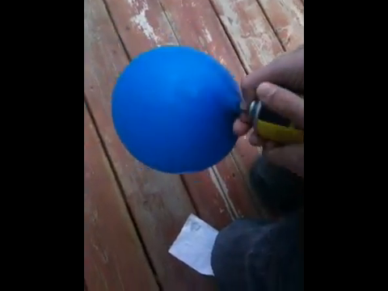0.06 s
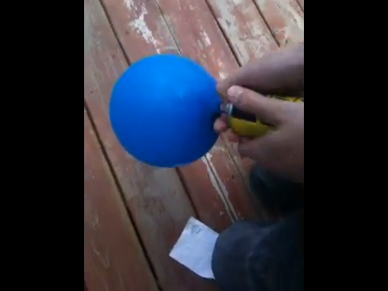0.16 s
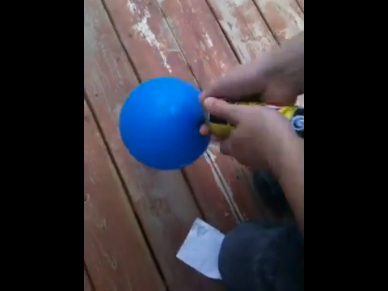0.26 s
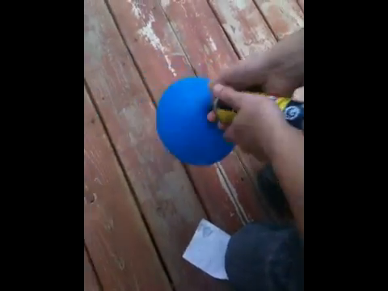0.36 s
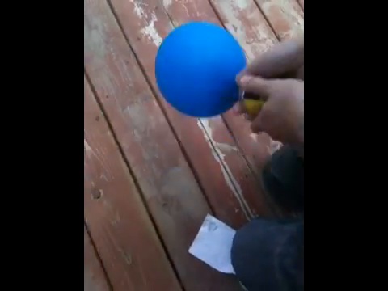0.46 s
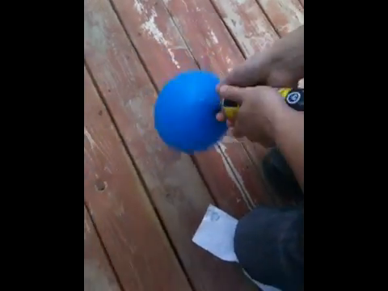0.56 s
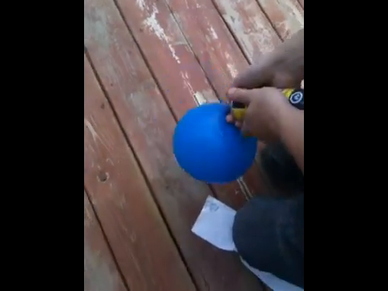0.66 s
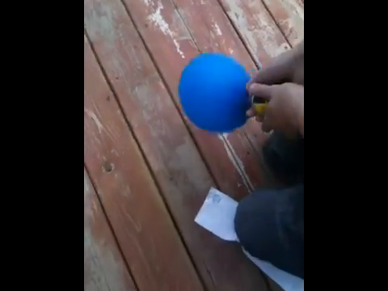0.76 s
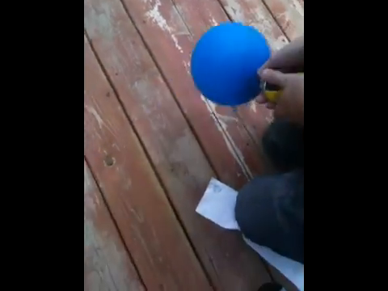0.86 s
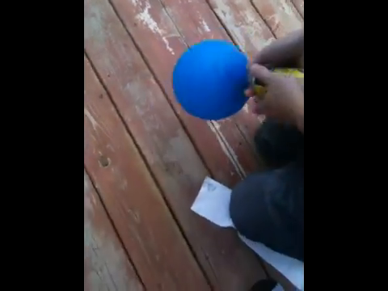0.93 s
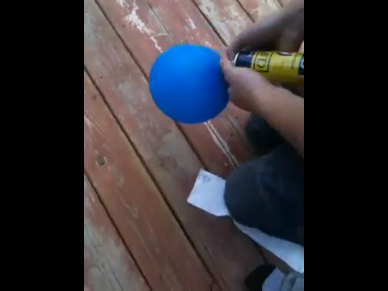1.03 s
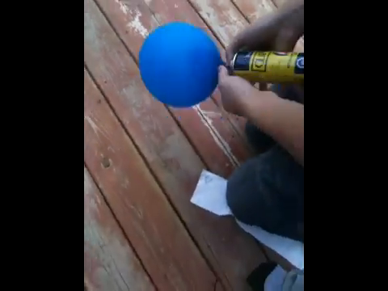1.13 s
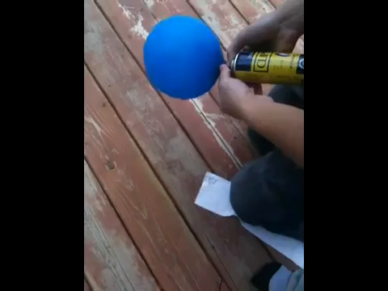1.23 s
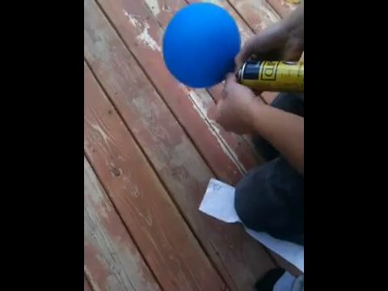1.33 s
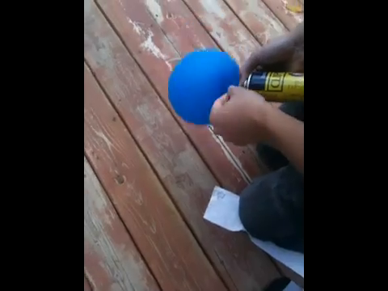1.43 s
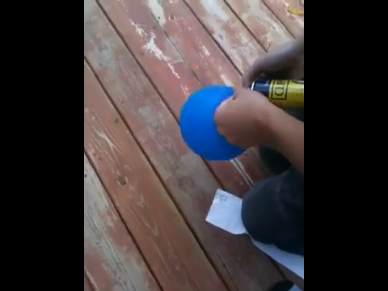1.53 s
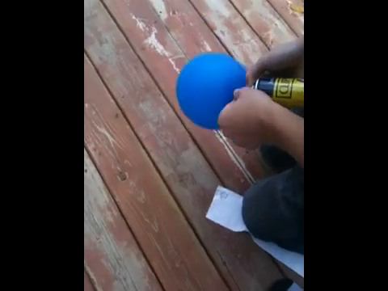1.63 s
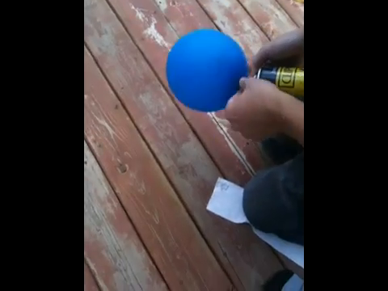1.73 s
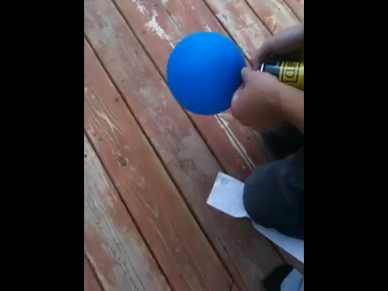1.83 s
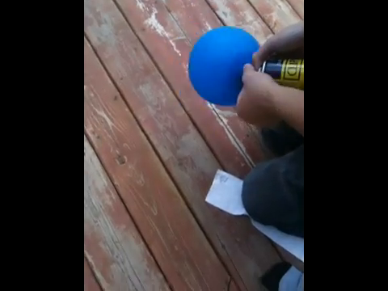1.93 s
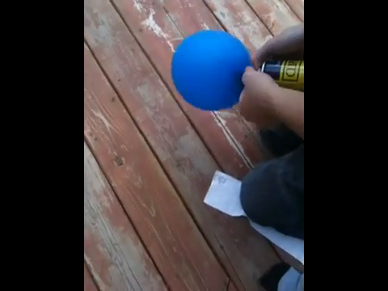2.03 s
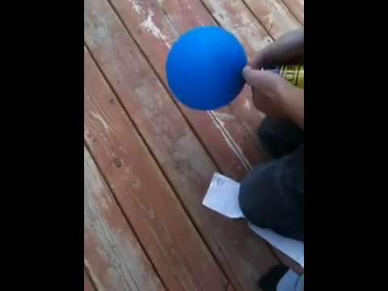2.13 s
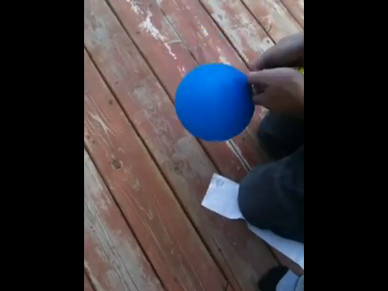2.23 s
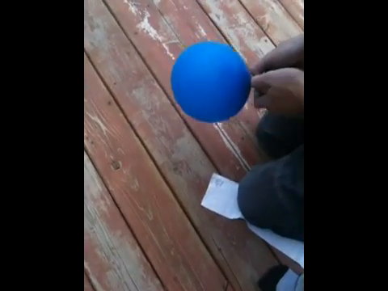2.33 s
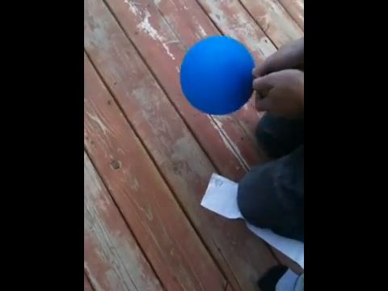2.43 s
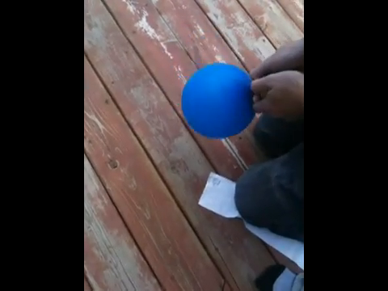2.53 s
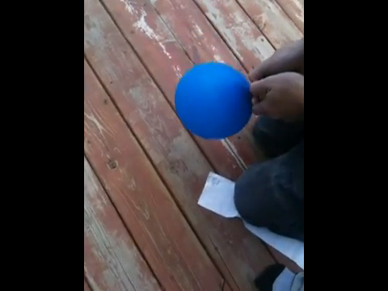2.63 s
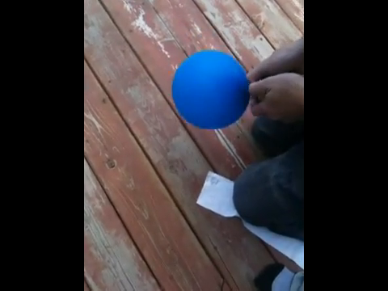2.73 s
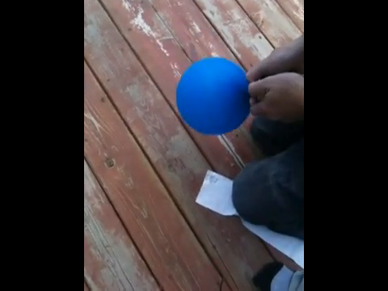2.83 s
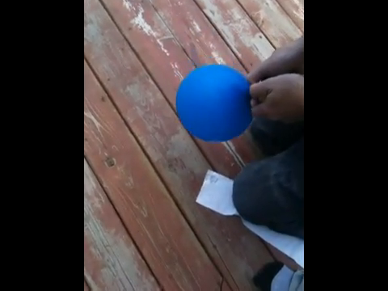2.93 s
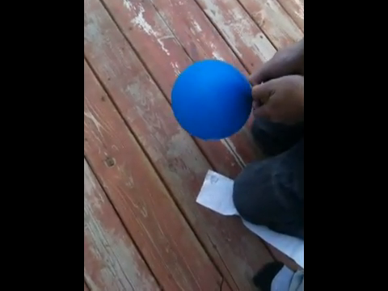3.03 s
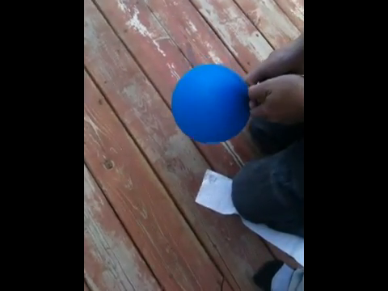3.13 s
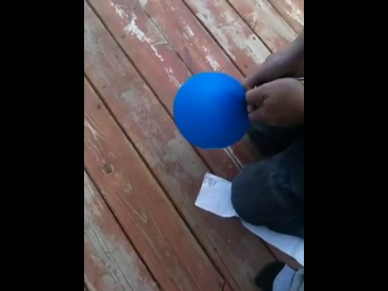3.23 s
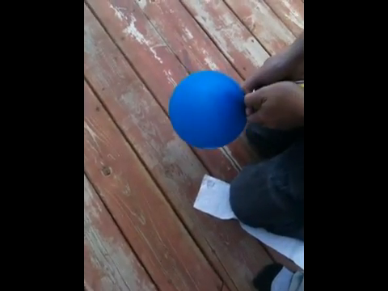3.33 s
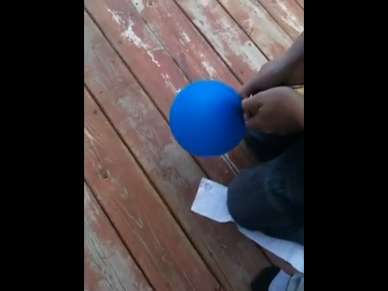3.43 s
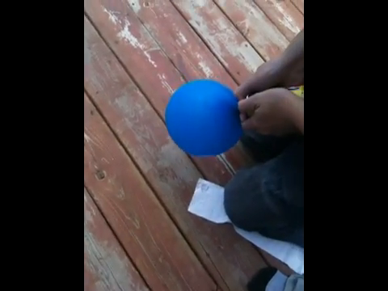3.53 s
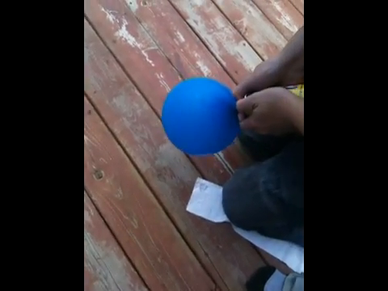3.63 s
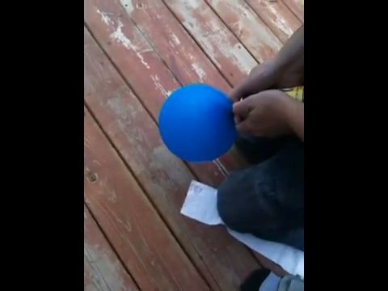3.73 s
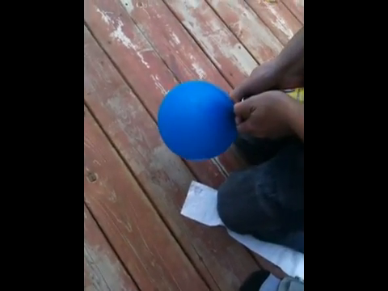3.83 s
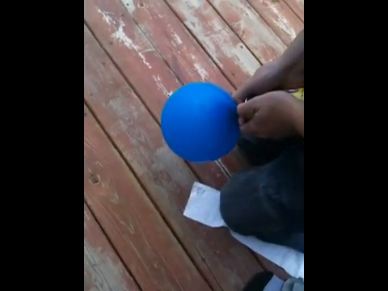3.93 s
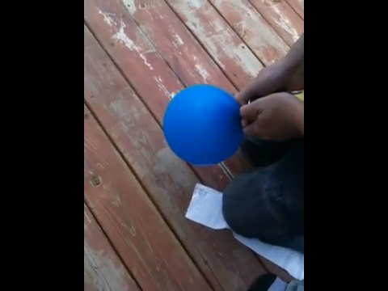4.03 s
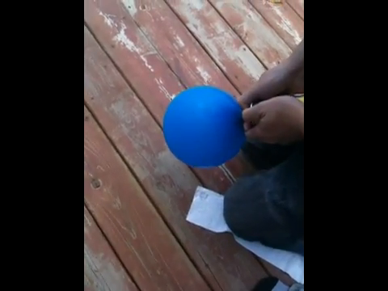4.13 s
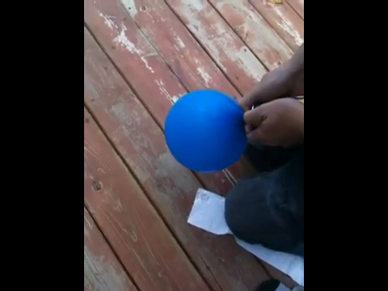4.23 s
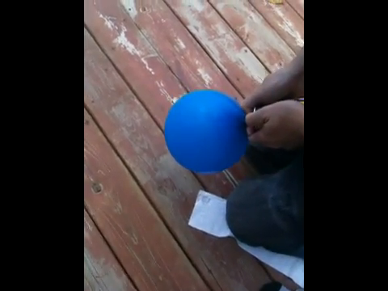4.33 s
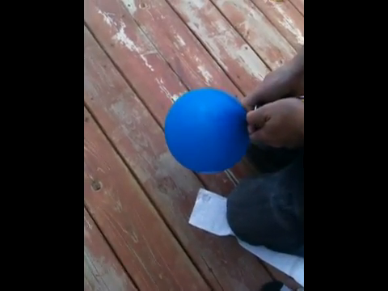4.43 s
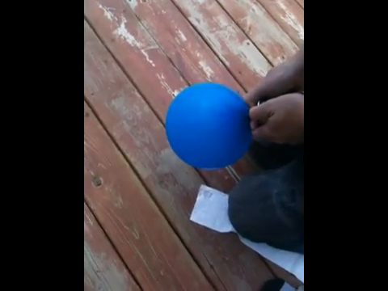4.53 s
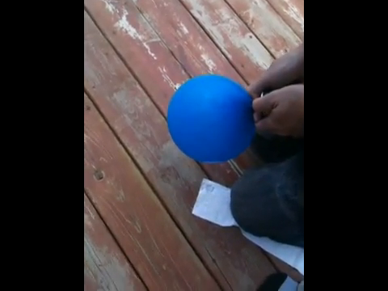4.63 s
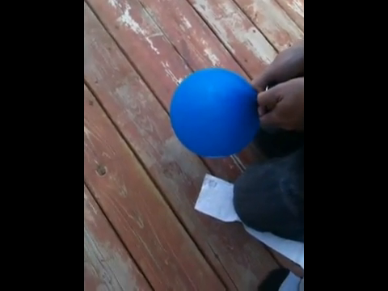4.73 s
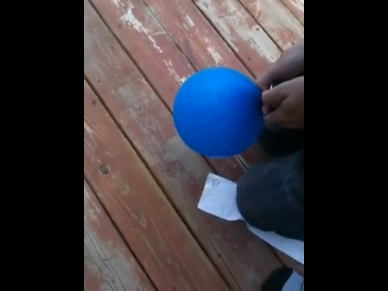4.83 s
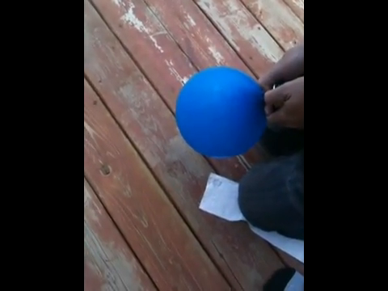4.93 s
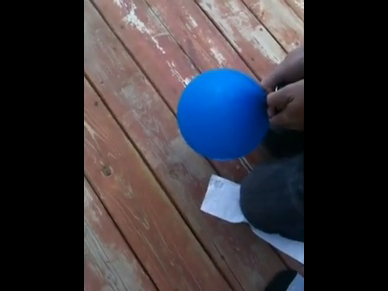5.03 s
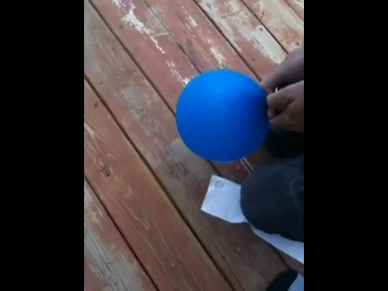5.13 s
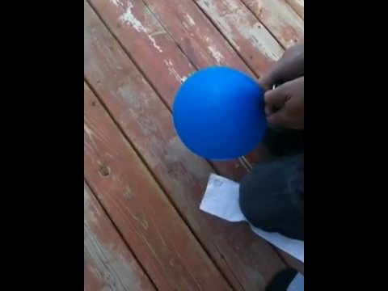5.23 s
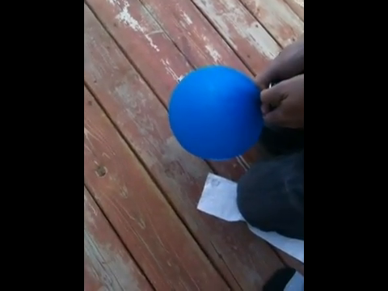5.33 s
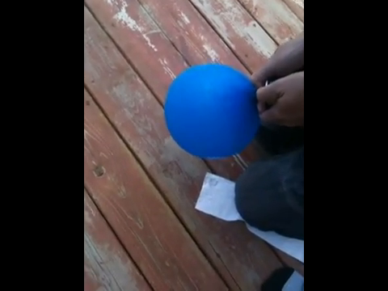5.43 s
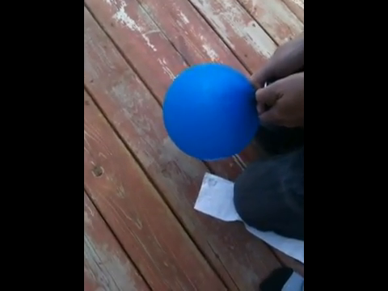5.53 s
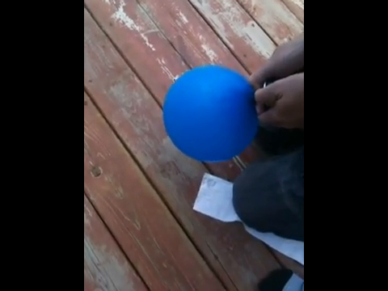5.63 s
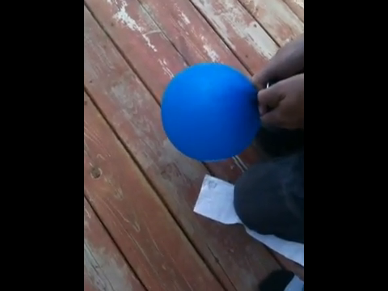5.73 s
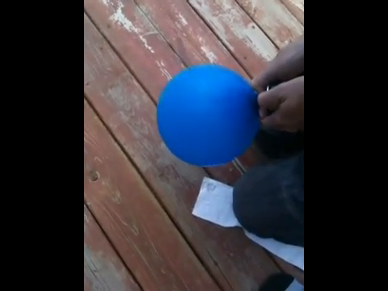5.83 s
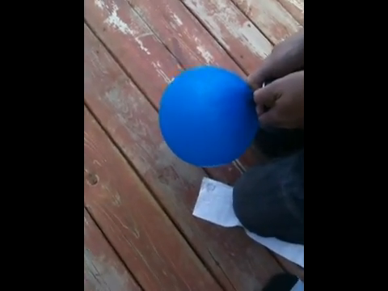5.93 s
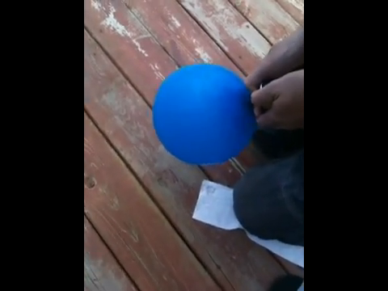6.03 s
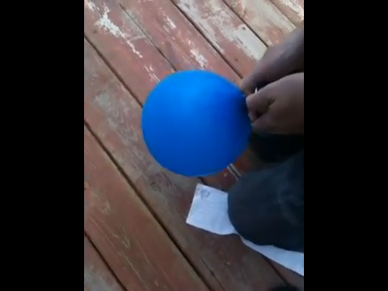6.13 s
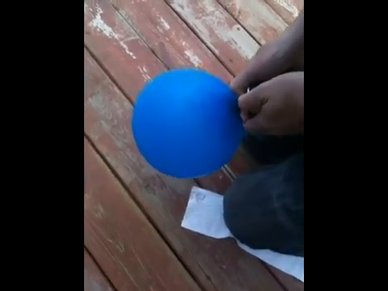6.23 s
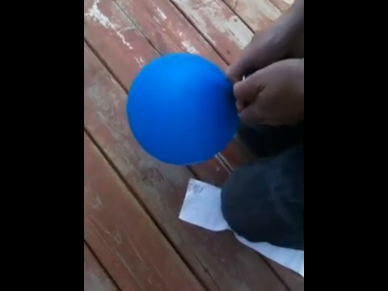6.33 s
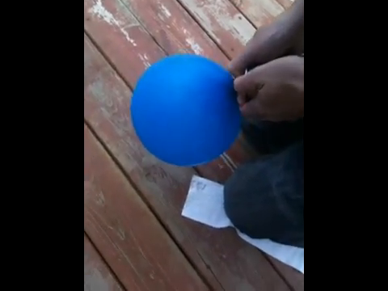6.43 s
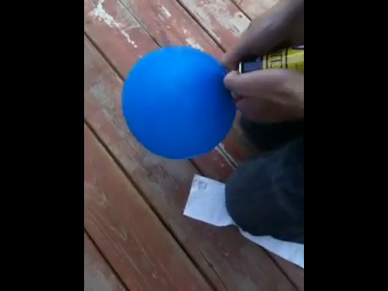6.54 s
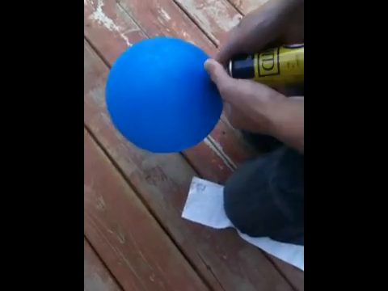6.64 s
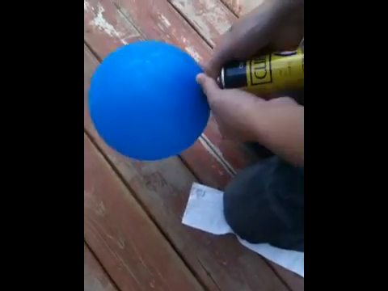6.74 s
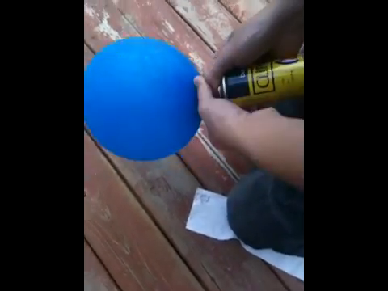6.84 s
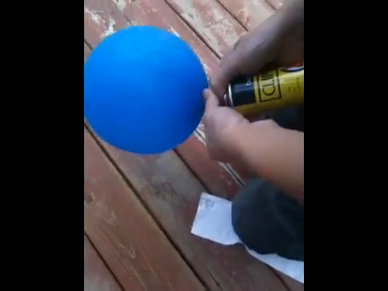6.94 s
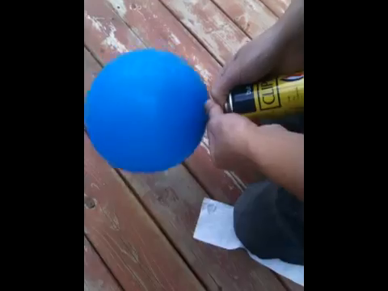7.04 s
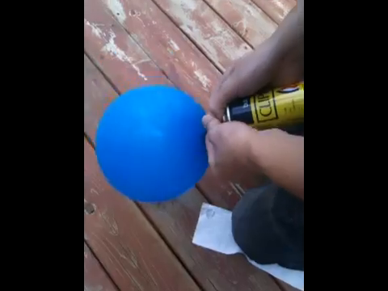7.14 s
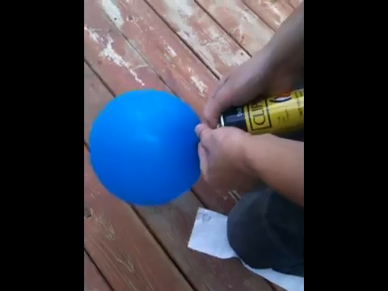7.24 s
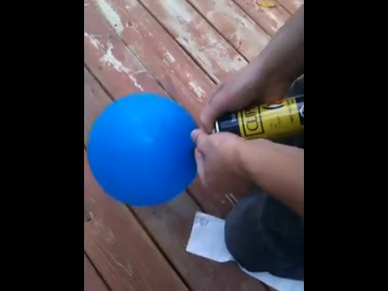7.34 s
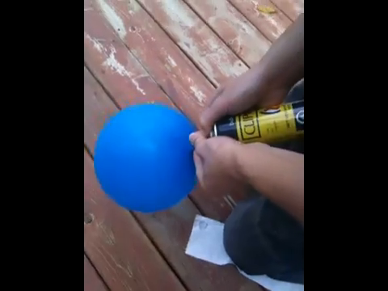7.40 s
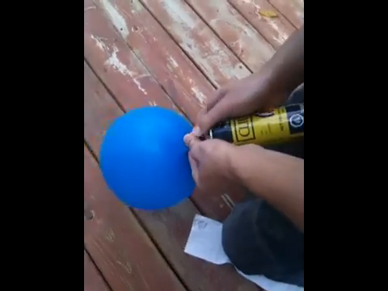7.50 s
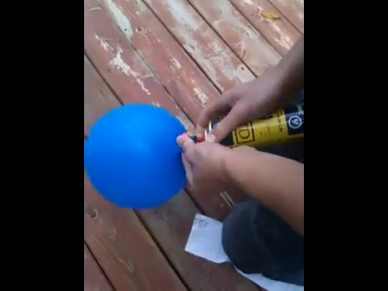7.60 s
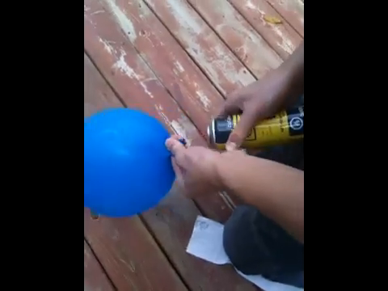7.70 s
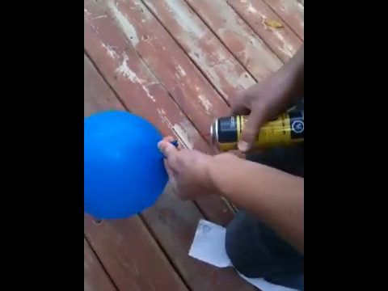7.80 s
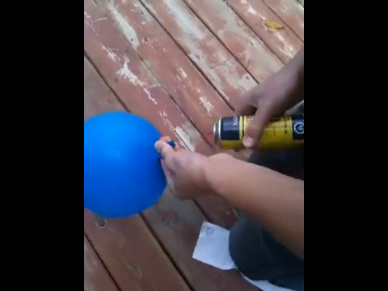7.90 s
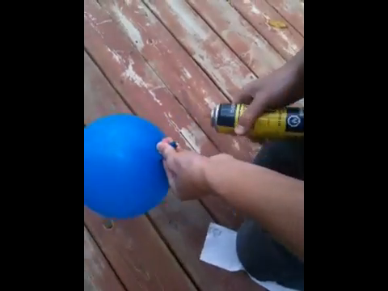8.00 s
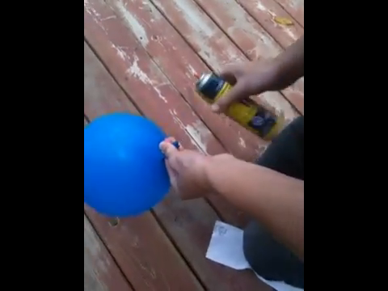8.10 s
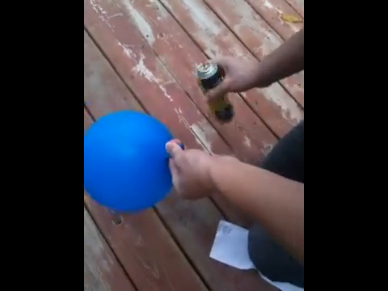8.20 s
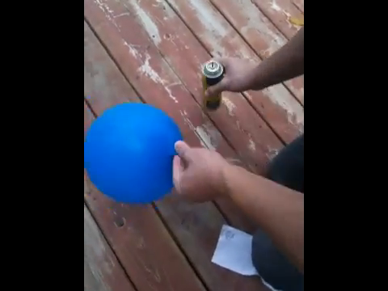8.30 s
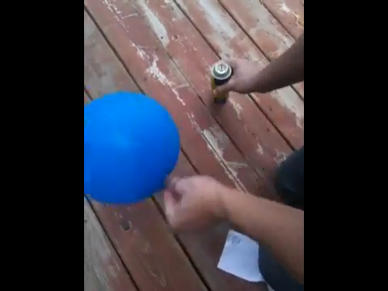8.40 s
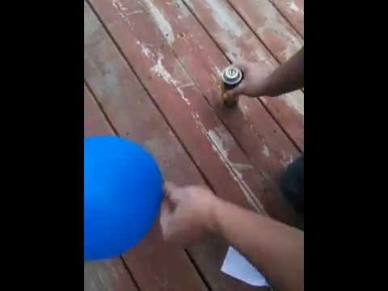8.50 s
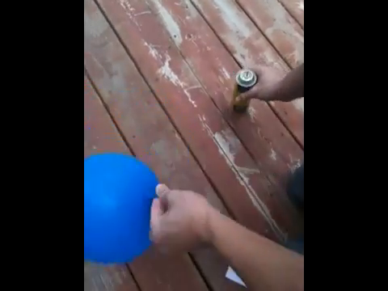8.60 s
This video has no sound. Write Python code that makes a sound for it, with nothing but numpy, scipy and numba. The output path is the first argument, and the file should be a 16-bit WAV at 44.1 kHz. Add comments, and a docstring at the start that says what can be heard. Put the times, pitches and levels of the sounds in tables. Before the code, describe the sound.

Gas hisses from a pressurised can into a rubber balloon, first in uneven squirts, then a long stream, with nozzle clicks.

```python
"""First comes a short, uneven squirt of gas from a pressurised can into a rubber balloon, then a long
stream. The jet hisses at the nozzle and makes the gas in the balloon ring, lower as the balloon swells.
Fingers rub and bump the rubber. The nozzle clicks as it is put in and pulled out, and a wooden deck
throws a little of each click back. A low outdoor murmur lies behind it all."""
import sys
import numpy as np
from scipy import signal
from scipy.fft import rfft, irfft
from scipy.io import wavfile
from scipy.ndimage import uniform_filter1d, map_coordinates
from numba import njit

SR = 44100
rng = np.random.default_rng(int(sys.argv[2]) if len(sys.argv) > 2 else 0)


def pcm_store(signal):
    """Save signal as 16-bit PCM."""
    levels = np.round(np.clip(np.atleast_2d(signal), -1, 1) * 32767)
    wavfile.write(sys.argv[1], SR, levels.astype(np.int16).T)


N = 382080
TIME = np.arange(N) / SR

# resonances of the gas in the balloon at radius 1:
# f/Hz, width/Hz, relative level/dB, t/s when the jet drives it best, half length of that swell/s
BALLOON_RESONANCES = [(2130, 190, -18.5, 4.1, 1.7), (2462, 190, -5.5, 5.05, 1.46),
                      (2883, 290, -4.5, 4.97, 1.55), (3287, 130, -11.5, 5.8, 3.5),
                      (3783, 150, -11, 5.3, 0.88), (3980, 230, -8.5, 4, 0.28), (3990, 700, -13, 5.4, 1.7),
                      (4270, 300, -12.5, 3.56, 0.95), (4740, 860, -9.5, 3, 0.41),
                      (5316, 190, -13.5, 4.38, .4), (5450, 360, -10.5, 5.14, .4),
                      (5530, 170, -15, 3.55, .35), (5630, 740, -16.5, 6.2, 1.5),
                      (6600, 300, -17, 6.47, 0.33), (7030, 160, -12.5, 4.84, .3),
                      (7400, 150, -12.5, 5.15, .55), (7940, 220, -13, 4.3, 0.45),
                      (7880, 1900, -8.5, 4.46, 1.3), (8400, 350, -10, 4.1, 0.58),
                      (9020, 1100, -10.5, 4.2, 3.2), (9570, 180, -7.5, 4.84, 0.57), (9530, 900, -9, 5, 2.4),
                      (10230, 410, -8, 5.85, .45), (10500, 1700, -9.5, 6, 1.5),
                      (11460, 3600, -10.5, 5, 2.6), (13900, 7700, -9, 5.5, 1.3),
                      (14130, 600, -16, 5.15, .4)]
# tone colour (how strong each frequency is) of the steady jet: f/Hz, level/dB
JET_COLOUR = [(880, -41), (1500, -19), (1900, -13), (2250, -12), (2500, -7), (3400, -5), (4100, -6.5),
              (5000, -7), (6600, -6), (8000, -5), (9500, -1), (11000, -5), (14500, -7.5), (15700, -10.5)]
# colour of the jet with the valve barely open: f/Hz, level/dB
SQUIRT_COLOUR = [(900, -29), (1600, -24), (2100, -14.5), (2700, -13), (3500, -11), (4300, -10.5),
                 (5400, -6.5), (6700, -2.5), (7900, 2.5), (9400, 6), (10400, 0.5), (11400, -2.5),
                 (14500, -1.5), (15700, -3)]
# colour of the low rush of gas entering the balloon: f/Hz, level/dB
RUSH_COLOUR = [(170, -20), (270, -6.5), (420, -7.5), (650, -4), (900, -2), (1040, -4.5), (1220, 2),
               (1440, -6.5), (1620, 0), (1850, -13), (2100, 0), (2600, -36)]
# short spurts and dribbles of the valve:
# t/s, attack/s, hold/s, release/s, hiss level/dB, hollow level/dB, leak level/dB
SPURTS = [ (0.0, .023, 0.09, 0.082, -36, -44, -53), (0.192, 0.039, 0.34, 0.19, -47.5, -52.5, -59.5),
          (0.473, 0.037, 0.038, 0.016, -43, -55, -50.5), (0.714, 0.012, .009, 0.043, -41.5, -62, -56),
          (0.802, 0.032, 0.036, 0.024, -46, -57, -52), (0.878, 0.021, 0.091, 0.033, -49.5, -56, -68),
          (2.16, .023, 0.053, 0.036, -73, -70.5, -71), (2.275, 0.018, 0.017, 0.03, -56.5, -63, -62),
          (2.37, 0.021, 0.19, 0.18, -48, -61, -62), (2.71, .04, .02, 0.067, -41.5, -51, -56),
          (3.28, .023, 0.045, 0.079, -39.5, -61, -55), (3.796, 0.031, 0.23, 0.24, -39, -45.5, -69),
          (5.45, 0.29, 0.34, 0.11, -41.5, -50.5, -48.5), (6.654, 0.026, 0.11, 0.02, -49, -51.5, -66),
          (6.86, .023, 0.78, 0.04, -71, -84, -77), (7.223, 0.039, .2, 0.037, -74, -82, -73), ]
# clicks of nozzle, rubber neck and can: t/s, body level/dB, snap level/dB, 60 dB fade time/s, f/Hz
CLICKS = [(0.511, -47, -44, .028, 2900), (.707, -54, -55, .035, 2790), (0.904, -20, -32, 0.015, 2670),
          (.9044, -27.5, -40, 0.029, 3750), (0.9085, -35, -46, .03, 2530), (1.510, -61, -52, .027, 3300),
          (1.556, -56, -61, 0.018, 2600), (1.779, -51, -61, .03, 2820), (7.5440, -39.5, -50, 0.012, 2950),
          (7.554, -52, -57, .012, 3000), (7.5842, -33, -42, 0.016, 2980), (7.596, -49, -58, 0.013, 2930),
          (7.641, -63, -52, .012, 3000), (7.732, -34, -39, 0.01, 3020), (7.7365, -41, -49, .022, 3710),
          (7.748, -39, -34.5, 0.023, 2980), (8.31, -56, -54, .03, 3950), (8.544, -56, -60, 0.024, 2020)]
# resonances of the neck in a click: multiple of the click's pitch, width/Hz, level/dB
NECK_RESONANCES = [(.52, 900, -3), (.8, 400, -6), (1, 456, 11), (1.22, 450, 2), (1.52, 550, -3),
                   (2.2, 1100, -22)]
# colour of a click's bright snap: f/Hz, level/dB
SNAP_COLOUR = [(3500, -17), (5000, -2), (6300, -3), (8600, -6), (9500, 2), (11000, -9), (15500, -12)]
# fingers sliding on rubber and can: middle t/s, half length/s, rustle level/dB, dull rub level/dB
RUBS = [ (0.062, 0.12, -69, -69), (0.736, 0.054, -54, -65), (1.062, 0.078, -67, -83),
        (1.174, 0.062, -58.5, -63), (1.294, 0.035, -60.5, -76), (1.45, 0.38, -69.5, -84),
        (1.796, 0.039, -62, -69), (2.182, 0.073, -66, -65), (6.098, 0.13, -70, -55),
        (6.316, 0.047, -70, -52.5), (6.993, 0.17, -67.5, -69), (7.25, 0.28, -66, -64),
        (7.652, 0.2, -63.5, -74), (8.47, 0.081, -68.5, -75), (8.637, 0.08, -68.5, -71), ]
# colour of the fingers' rustle: f/Hz, level/dB
RUSTLE_COLOUR = [(710, -23), (1200, -6), (1290, -3), (1830, -1.5), (1990, -0.5), (2780, -1.5), (3710, -7),
                 (4560, -5), (9500, -6), (15700, -20)]
# soft bumps on the balloon, the low knock of a nozzle click, and one dry tick:
# t/s, level/dB, f/Hz, width/Hz, time to the peak/s
CONTACTS = [(0.699, -65, 121, 110, 0.021), (0.903, -46, 1270, 900, 0.0015), (1.245, -58, 660, 300, 0.012),
            (1.7765, -51.5, 1500, 3500, 0.004), (1.788, -59, 600, 700, 0.0093),
            (2.117, -62, 595, 600, 0.011), (2.177, -60, 652, 500, 0.014), (5.471, -56, 302, 251, 0.022),
            (5.479, -46.5, 806, 232, 0.02), (5.513, -49.5, 637, 200, 0.022),
            (6.634, -53.5, 584, 506, 0.018), (6.982, -57.5, 330, 248, 0.028)]
# knocks of the hand on the tight balloon: t/s, peak level/dB, f/Hz, time to the peak/s
KNOCKS = [(1.7765, -44, 230, 0.0042), (2.197, -44.5, 228, 0.0063)]
# colour of the outdoor murmur: f/Hz, level/dB
MURMUR_COLOUR = [(25, -43), (50, -33), (75, -27), (100, -14.5), (125, -10), (160, -5.5), (200, -2),
                 (260, -3.5), (325, -11), (500, -11.5), (1000, -16.5), (2860, -26), (7200, -30.5),
                 (15700, -34.5)]


def gas_jet(hiss, hollow, split_hz=5000, aimed_s=5.1, aimed_span_s=1.5, hollow_trim_db=-0.5):
    """The jet is partly heard through the rubber and partly rings in the balloon's resonances."""
    radius = balloon_radius(hiss / hiss.max())
    # more of the sound rings while the jet aims squarely in
    ring_share = 0.17 + 0.45 * np.exp(-((TIME - aimed_s) / aimed_span_s) ** 2)
    barely_open = TIME < 2.239
    jet = np.where(barely_open, noise(SQUIRT_COLOUR), noise(JET_COLOUR))
    jet = balloon_echoes(jet, radius, np.where(barely_open, 0.18, 0.2 + 0.5 * ring_share))
    ring = undb(-0.28) * balloon_echoes(balloon_ring(radius), radius, 0.22 * ring_share)
    jet_low, jet_high = split(jet, split_hz)
    ring_low, ring_high = split(ring, split_hz)
    jet_gain = np.sqrt(1 - ring_share)
    stream = hollow * undb(hollow_trim_db) * (jet_gain * steady(jet_low) + ring_low)
    stream += hiss * (jet_gain * steady(jet_high) + ring_high)
    # a barely open valve sputters; droplets of liquid gas make the jet flutter and spit
    sputter_db = 1.2 * barely_open * wander(140)
    flutter_db = 0.65 * wander(45)
    spit_db = 0.56 * wander(900)
    return stream * undb(sputter_db + flutter_db - spit_db) + low_rush(hollow, radius)


def valve(open_s=2.373, full_s=4.58, let_go_s=6.418, press_db_per_s=7.5, sag_db_per_s=2.5):
    """Strength of high hiss, hollow lower band and leak as the valve is pressed and let go."""
    press_db = -press_db_per_s * np.maximum(full_s - TIME, 0)  # pressed ever harder
    sag_db = -sag_db_per_s * np.maximum(TIME - full_s, 0)  # the can cools
    closing = np.exp(-(np.maximum(TIME - let_go_s, 0) / 0.22) ** 2)
    stream = undb(press_db + sag_db) * fade_in(open_s, 0.067) * closing
    # the hollow band moves 0.78 dB for each dB of hiss; only the spurts leak
    power = np.array([undb(-28) * stream, undb(-38) * stream ** 0.78, np.zeros(N)]) ** 2
    for start, attack, hold, release, *levels_db in SPURTS:
        spurt = fade_in(start, attack) * np.exp(-np.maximum(TIME - start - hold, 0) / release)
        power += np.outer(undb(levels_db), spurt) ** 2
    return np.sqrt(power)


def balloon_radius(strength, swell_per_s=0.09, radius_one_s=4.9):
    """The balloon's relative radius: its volume grows with all the gas let in so far."""
    volume = swell_per_s * np.cumsum(np.sqrt(strength)) / SR
    return np.cbrt(1 + volume - np.interp(radius_one_s, TIME, volume))


def balloon_ring(radius, wander_db=2.0, off_peak_db=-12, wobble=0.0014):
    """Each resonance swells at its own time, sinks as the balloon grows and wobbles in the hand."""
    held_radius = radius * (1 + wobble * wander(5))
    ring = np.zeros(N)
    for hz, width, db, best_s, span_s in BALLOON_RESONANCES:
        drive_db = off_peak_db * (1 - np.exp(-((TIME - best_s) / span_s) ** 2))
        ring += undb(db + drive_db + wander_db * wander(9)) * noise_band(hz / held_radius, width)
    return ring


def balloon_echoes(sound, radius, echo_share, patterns=4, fade_s=0.04):
    """Some sound bounces round the balloon, in echo patterns that come and go as the jet wanders."""
    age, index = TIME[:SR // 20], np.arange(N)
    # a wider balloon stretches every echo, so the echoes are made on a clock that slows down
    clock = (N - 1) * np.cumsum(1 / radius) / np.sum(1 / radius)
    inside = map_coordinates(sound, [np.interp(index, clock, index)], order=5, mode="mirror")
    aims = np.array([np.roll(wander(1.8), rng.integers(SR)) for _ in range(patterns)])
    echoes = np.zeros(N)
    for weight in aims / np.linalg.norm(aims, axis=0):
        pattern = rng.standard_normal(len(age)) * fade_out(age, fade_s)
        echoes += weight * signal.oaconvolve(inside, pattern / np.linalg.norm(pattern))[:N]
    echoes = map_coordinates(echoes, [clock], order=5, mode="mirror")  # back to normal time
    return np.sqrt(1 - echo_share) * sound + np.sqrt(echo_share) * echoes


def low_rush(hollow, radius, relative_db=-15, db_per_percent=0.46):
    """Gas entering the balloon makes a low rush that grows as the skin is stretched tight."""
    stretch_percent = 100 * (radius - 1)
    return hollow * undb(relative_db + db_per_percent * stretch_percent) * noise(RUSH_COLOUR)


def nozzle_leak(strength):
    """Gas squeezing past the nozzle sings in one breathy resonance."""
    return strength * noise_band(hz=2880, width_hz=450)


def nozzle_clicks(rise_s=0.00088, ping_db=6, deck_db=-30, deck_fade_s=0.29):
    """Each slip of the nozzle pings the neck, with a bright snap; the deck throws a little back."""
    snap_noise = noise(SNAP_COLOUR)
    out, age = np.zeros(N), TIME[:SR // 10]
    for start, body_db, snap_db, fade_s, hz in CLICKS:
        span = place(start, age)
        burst = sum(undb(db) * noise_band(multiple * hz, width, len(age))
                    for multiple, width, db in NECK_RESONANCES)
        ping = undb(ping_db) * np.sqrt(2) * np.sin(2 * np.pi * hz * age)
        snap = undb(snap_db) * snap_noise[span]
        direct = fade_out(age, fade_s) * (undb(body_db) * unit(burst + ping) + snap)
        deck = fade_out(age, deck_fade_s) * (undb(body_db) * unit(burst) + snap)
        out[span] += np.minimum(age / rise_s, 1) * (direct + undb(deck_db) * deck)
    return out


def finger_rubs(grain_db=1.5):
    """Skin slides in tiny slips over the rubber; each rub swells and fades."""
    power = np.zeros((2, N))
    for middle_s, half_s, *levels_db in RUBS:
        swell = np.exp(-((TIME - middle_s) / half_s) ** 2)
        power += np.outer(undb(levels_db), swell) ** 2
    rustle, rub = np.sqrt(power)
    dull_noise = noise([(250, -4), (450, -2.0), (800, 0.5), (1600, -19), (2500, -30)])
    return (rustle * noise(RUSTLE_COLOUR) + rub * dull_noise) * undb(grain_db * wander(300))


def small_contacts():
    """Each bump, knock or tick swells and dies away in one broad resonance."""
    out, age = np.zeros(N), TIME[:SR // 2]
    for start, db, hz, width, rise_s in CONTACTS:
        out[place(start, age)] += undb(db) * pulse(age, rise_s) * noise_band(hz, width, len(age))
    return out


def hand_knocks():
    """Knocked by the hand, the whole balloon bounces for a few cycles on one low note."""
    out, age = np.zeros(N), TIME[:SR // 8]
    for start, db, hz, rise_s in KNOCKS:
        out[place(start, age)] += undb(db) * pulse(age, rise_s) * np.sin(2 * np.pi * hz * age)
    return out


def outdoors(murmur_db=-58.03, swell_db=0.7, drone_db=-68):
    """A distant murmur with a faint drone in it."""
    murmur = undb(murmur_db + swell_db * wander(3.05)) * noise(MURMUR_COLOUR)
    return murmur + undb(drone_db) * noise_band(hz=157, width_hz=25.3)


def undb(db):
    """Turn decibels into a number to multiply by."""
    return np.exp(np.asarray(db) * (np.log(10) / 20))


def unit(x):
    """Scale to an average strength (rms) of 1."""
    return x / np.sqrt(np.mean(x ** 2))


def steady(x):
    """Hold a sound near strength 1 while its colour changes."""
    return x / np.sqrt(uniform_filter1d(x ** 2, size=12000))


def noise(colour):
    """Noise of strength 1, shaped by rows of f/Hz, level/dB."""
    hz, db = np.transpose(colour)
    log_hz = np.log(np.arange(N // 2 + 1) * SR / N + 1)
    gain = undb(np.interp(log_hz, np.log(hz), db, left=-90, right=-90))
    return unit(irfft(rfft(rng.standard_normal(N)) * gain, N))


def noise_band(hz, width_hz, size=N):
    """Noise of strength 1, filtered twice into one steep resonance, fixed or gliding."""
    centre_hz = np.minimum(hz, SR * 4 / 9) * np.ones(size)
    once = band_pass(rng.standard_normal(size), centre_hz, float(width_hz))
    return unit(band_pass(once, centre_hz, float(width_hz)))


@njit
def band_pass(x, hz, width_hz):
    """Let through what lies near a moving centre frequency."""
    out, band_state, low_state = np.empty(len(x)), 0., 0.
    for i in range(len(x)):
        if i % 32 == 0:
            tuning, damping = np.tan(np.pi * hz[i] / SR), width_hz / hz[i]
        band = (band_state + tuning * (x[i] - low_state)) / (1 + tuning * (tuning + damping))
        band_state = 2 * band - band_state
        low_state += 2 * tuning * band
        out[i] = damping * band
    return out


def split(x, hz):
    """The parts of a sound below and above a frequency."""
    low = signal.sosfiltfilt(signal.butter(4, hz, fs=SR, output="sos"), x)
    return low, x - low


def wander(per_s):
    """A curve of strength 1 that slides to a new random value per_s times a second."""
    step = int(SR / per_s)
    held = np.repeat(rng.standard_normal(N // step + 1), step)
    return unit(uniform_filter1d(held, step)[:N])


def fade_in(full_s, attack_s):
    """Swell smoothly to 1 at full_s and stay there."""
    return np.exp(-(np.maximum(full_s - TIME, 0) / attack_s) ** 2)


def fade_out(age, fade_s):
    """Die away by 60 dB every fade_s."""
    return np.exp(-np.log(1000) * age / fade_s)


def pulse(age, rise_s):
    """Rise to 1 in rise_s, then die away."""
    return age / rise_s * np.exp(1 - age / rise_s)


def place(start_s, age):
    """The samples that a short sound takes up."""
    return slice(int(start_s * SR), int(start_s * SR) + len(age))


def scene():
    """Everything reaches one microphone, the same on both channels."""
    hiss, hollow, leak = valve()
    mono = gas_jet(hiss, hollow) + nozzle_leak(leak)
    mono += finger_rubs() + nozzle_clicks() + small_contacts() + hand_knocks() + outdoors()
    return np.array([mono, mono])


def record(dry, top_hz=15750):
    """The recorder cuts the highest treble steeply."""
    return signal.sosfilt(signal.ellip(10, 0.2, 70, top_hz, fs=SR, output="sos"), dry)


dry = scene()
out = record(dry)
pcm_store(out)
```